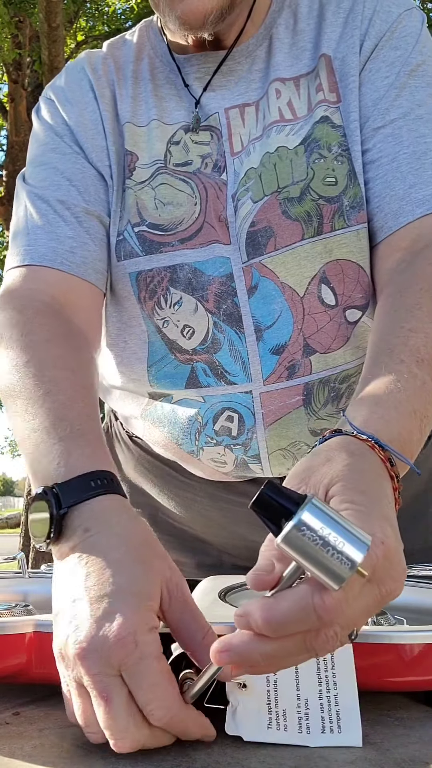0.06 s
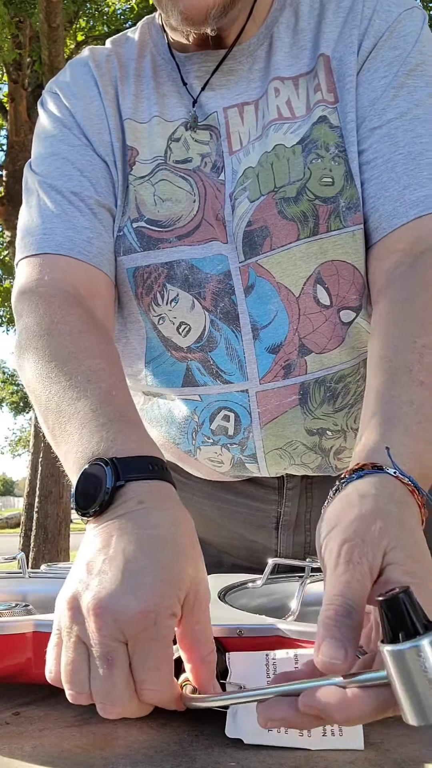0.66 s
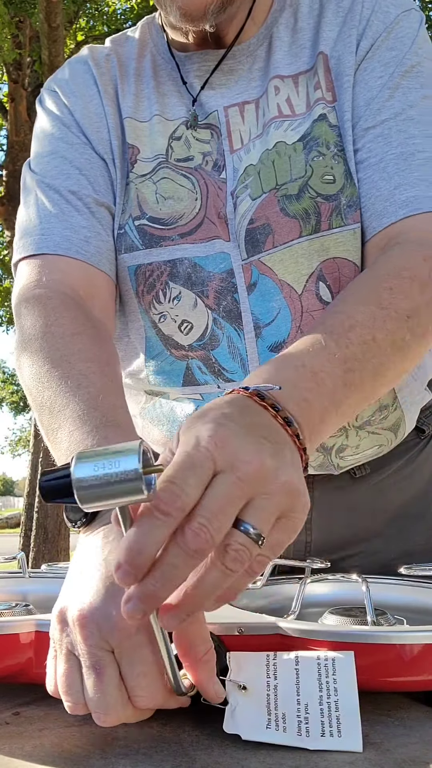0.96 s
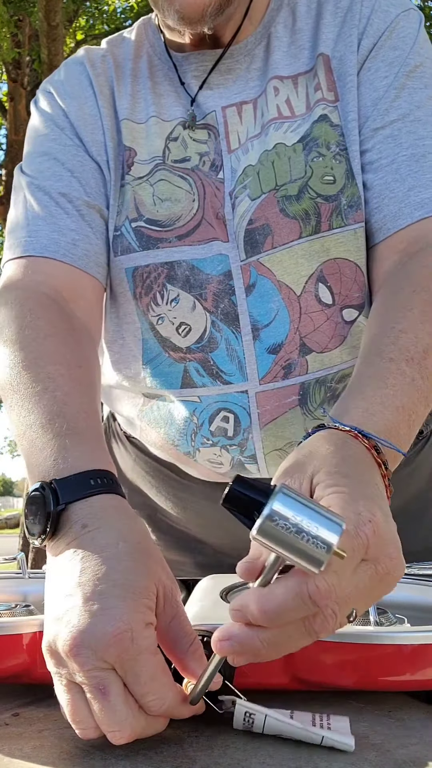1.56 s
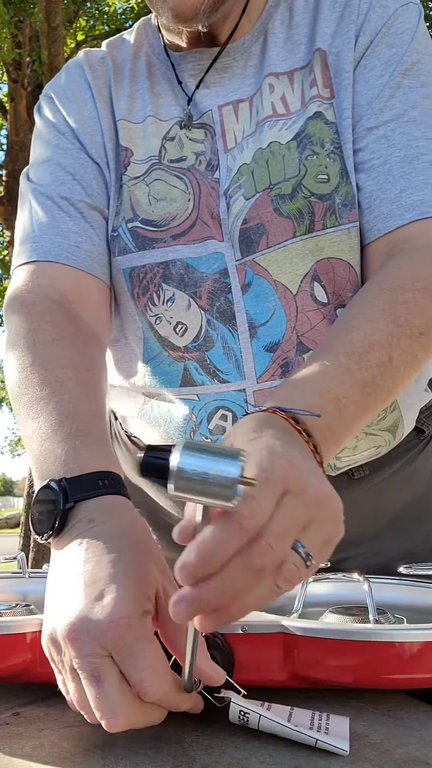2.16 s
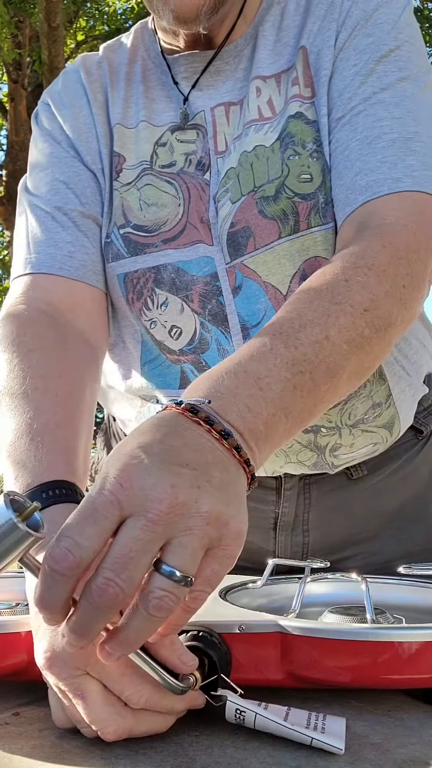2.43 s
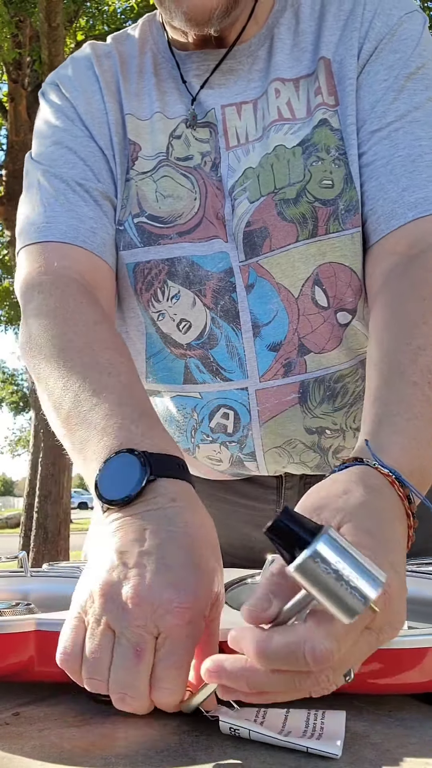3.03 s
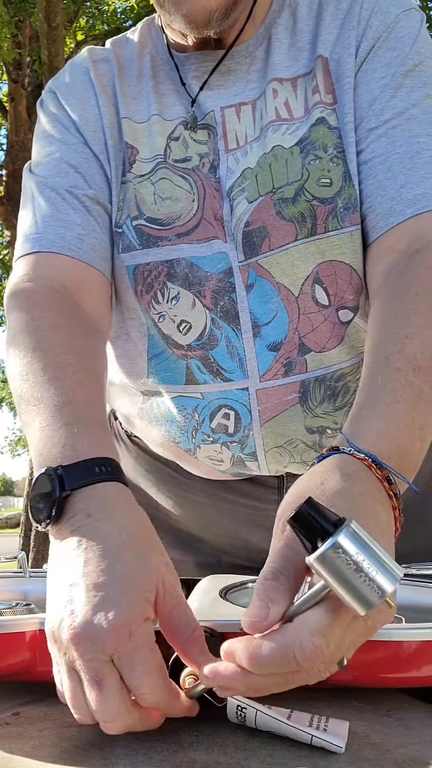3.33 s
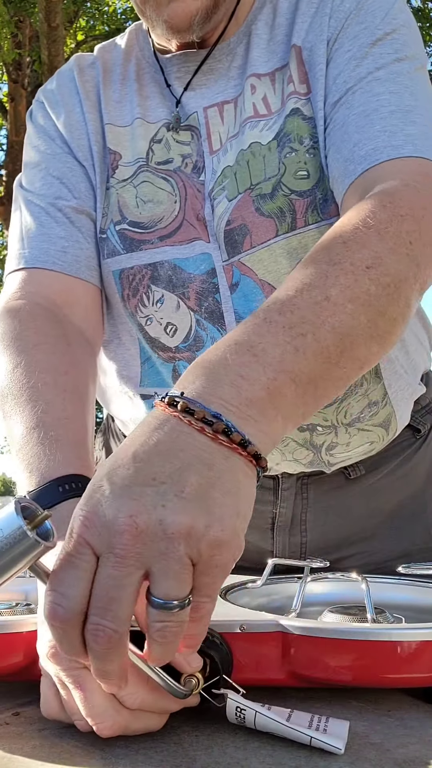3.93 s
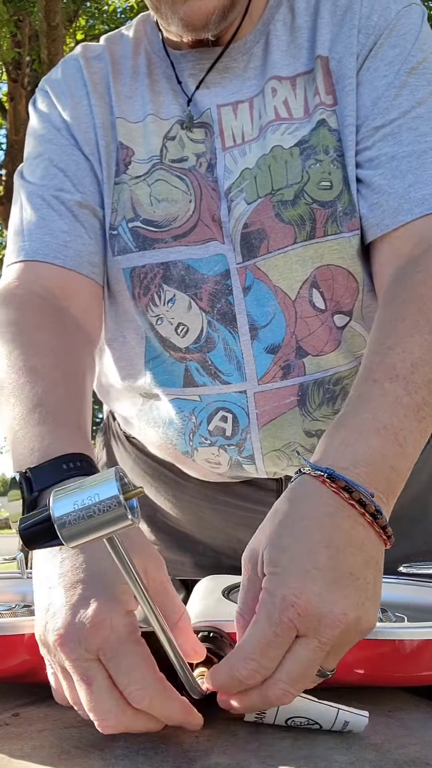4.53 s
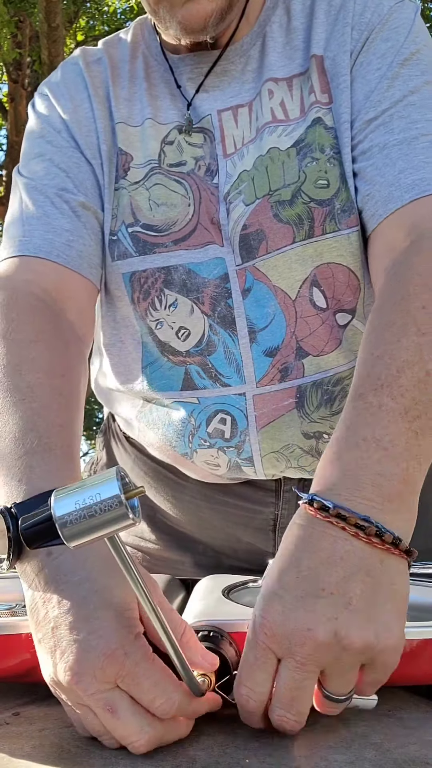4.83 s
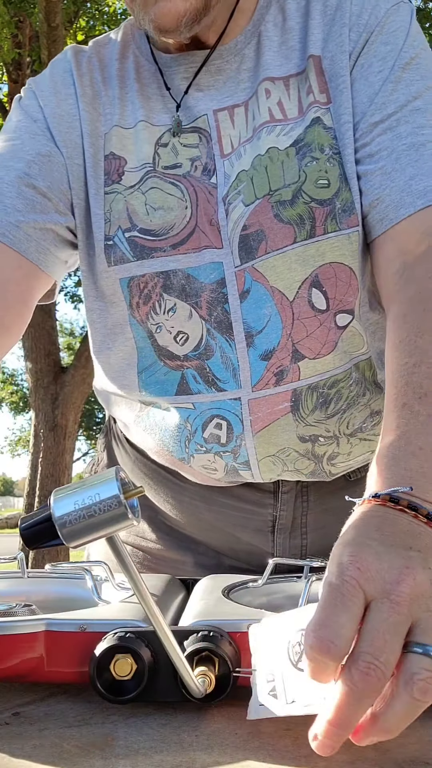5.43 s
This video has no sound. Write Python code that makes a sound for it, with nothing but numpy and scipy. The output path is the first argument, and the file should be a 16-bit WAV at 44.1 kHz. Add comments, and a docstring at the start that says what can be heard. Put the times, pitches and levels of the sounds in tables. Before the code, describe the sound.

Close by in the open air, hollow knocks from a camping stove mix with small, bright clicks as a gas regulator is worked into its inlet. The knocks come unevenly, each with a low thud from the table beneath. A very faint whistle passes midway, then comes a busier run of gritty metal scraping, sharp clicks and the hardest knock. A soft hush lies behind, with light air on the microphone.

```python
"""A metal gas regulator is pushed and twisted into a camping stove on an outdoor table.
The thread grinds and clicks as it sticks and slips, and the stove drags on its feet. Each push knocks
the stove body, the table booms a moment later, and after a hard push the stove hops once.
A faint whistle passes midway, and a distant hush lies behind. Two microphones in light, open air,
the stove nearer the right one."""
import sys
import numpy as np
from scipy import signal
from scipy.fft import rfft, irfft
from scipy.io import wavfile
from scipy.ndimage import uniform_filter1d

SR = 44100
rng = np.random.default_rng(int(sys.argv[2]) if len(sys.argv) > 2 else 0)


def put_to_file(sound):
    """Save the sound as 16-bit audio at rate SR, in the file named by the first command-line argument."""
    columns = np.atleast_2d(sound).T  # one column per channel
    safe = np.clip(columns, -1, 1)
    whole_steps = np.round(safe * 32767)
    wavfile.write(sys.argv[1], SR, whole_steps.astype(np.int16))


N = 246078
TIME = np.arange(N) / SR
HIT_TIME = TIME[:SR // 2]
LEFT_LAG_S = 0.00023  # the left microphone is farther from the stove

# Twists of the thread. Each row: time of full force in seconds, hold in seconds, level in dB,
# attack in seconds, low ring of the fitting in dB.
TWISTS = [(0.0, 0.023, -42.5, .01, 3), (1.283, 0.07, -61.5, .15, 3), (1.455, .025, -42, 0.054, -14),
          (4.319, 0.032, -62.5, 0.25, -4), (4.536, 0.03, -43.5, 0.09, 1.5), (4.734, 0.13, -46, 0.012, 1),
          (4.903, 0.082, -50.5, 0.025, 1.5), (5.081, 0.014, -37, 0.0053, -9.5),
          (5.2, 0.074, -63.5, 0.03, -10), (5.46, 0.009, -45.5, 0.1, -11), (5.548, .04, -44, .04, -34)]
# The regulator sliding on the inlet rim, and the stove shoved along the table.
# Each row: time of full force in seconds, hold in seconds, level in dB, attack in seconds.
RIM_SLIDES = [(4.34, 0.086, -58, 0.14), (4.834, 0.36, -56.5, 0.039), (5.333, .02, -38, 0.057)]
SHOVES = [(0.0, .01, -37, .01), (0.3, .02, -43, .05), (4.303, .07, -46, 0.067), (4.791, 0.19, -51.5, .05),
          (4.96, 0.13, -47.5, .01), (5.174, .008, -40, .008), (5.248, 0.071, -52, .01),
          (5.454, 0.038, -40, .04), (5.548, .03, -33, .02)]
# The distant hush. Each row: time in seconds, level in dB.
HUSH_LEVELS = [(0, -44), (1.2, -46), (2.6, -50.5), (4.1, -50.5), (4.7, -48), (5.58, -50.5)]
# Catches of the thread. Each row: start in seconds, level in dB, slip length in seconds, pitch in Hz.
CATCHES = [(0.055, -26.5, 0.0081, 3520), (0.099, -27, 0.0058, 6150), (1.179, -42, .003, 7200),
           (1.246, -44, .0025, 7200), (1.304, -39, .009, 2860), (1.342, -36.5, 0.002, 4400),
           (1.489, -28, 0.0014, 4600), (1.523, -26.5, 0.001, 4200), (1.684, -30, .002, 4680),
           (1.981, -35.5, 0.0035, 4100), (2.036, -40.5, 0.013, 4230), (2.13, -37.5, 0.0058, 4680),
           (2.447, -44, 0.0054, 4430), (2.51, -46.5, 0.011, 2850), (2.873, -44, 0.006, 4360),
           (2.902, -44.5, 0.0034, 4700), (3.136, -36, 0.004, 4600), (3.17, -40.5, 0.0045, 4560),
           (3.243, -25, 0.0029, 4800), (3.364, -36.5, 0.0013, 5330), (4.226, -46.5, .005, 4330),
           (4.503, -22, 0.014, 4540), (4.561, -24.5, 0.014, 5130), (4.748, -22.5, 0.0032, 3170),
           (4.836, -30.5, 0.019, 5700), (4.907, -27.5, 0.0091, 2850), (4.935, -41, 0.0012, 4300),
           (4.961, -23.5, 0.0053, 4550), (4.988, -28, 0.0042, 5950), (5.044, -15, 0.0082, 6670),
           (5.08, -12, 0.0018, 2290), (5.406, -34, 0.0019, 9400)]
# Pushes on the stove. Each row: start in seconds, level in dB, pitch of the blow in Hz,
# then trims in dB for the metal tick, the body ring and the table boom.
PUSHES = [(0.237, -34.5, 158, -12.5, -13, 0.5), (0.310, -34.5, 478, -26, 9, -4),
          (0.767, -19.5, 392, -21.5, 0, 1), (0.92, -24, 360, -31, -3.5, -4.5),
          (1.187, -19, 367, -28, -1, 1), (1.616, -41, 169, -17, -7, 6), (1.919, -33, 323, -6.5, 0.5, 4),
          (2.0782, -11, 435, -13.5, -0.5, 1.5), (3.089, -32, 337, -4.5, 10, 9.5),
          (3.245, -12.5, 371, -9, 1, 1.5), (3.318, -13.5, 453, -8, 3, 3),
          (3.328, -26.5, 700, -22, 9.5, -15), (3.824, -30, 336, -37, 1.5, -9),
          (4.038, -35, 315, -30, -4, -6.5), (4.449, -5.5, 504, -10, 1.5, -2),
          (5.163, -28.5, 269, -5, -7, -10), (5.456, -36.5, 410, -29, 15, 12),
          (5.486, -27, 297, -24, 1.5, -5.5), (5.548, -21.5, 287, -29, -2.5, 6)]

# Modes of the brass thread and inlet tube, the stove body and griddle, and the table top.
# Each row: frequency in Hz, level in dB, time to fall 60 dB in seconds.
FITTING_MODES = [(2550, 0.5, 0.013), (3029, 12.5, 0.024), (3830, -8.5, 0.18), (4200, -3.5, 0.014),
                 (4890, -7.5, 0.045), (5800, -3.5, .02), (6250, -0.5, .012)]
STOVE_MODES = [(158, 1, 0.078), (210.5, -20.5, 0.82), (263, -6, 0.21), (296.3, -1, 0.22), (334, -15, 0.56),
               (386.1, -2, 0.18), (426.3, -27, 0.48), (533.8, -9, 0.15), (604, -12.5, 0.18),
               (728.4, -5, 0.14), (796, -3, 0.078), (876, -5.5, 0.1), (1019, -13.5, 0.41), (1190, 1, 0.071),
               (1313, -8, 0.09), (1540, -9, 0.13), (1520, -31.5, .14)]
TABLE_MODES = [(57.2, -5.5, 0.54), (72.7, -6, 0.33), (95.14, 2, 0.34), (114.9, -21, 0.87), (145, -11, 0.28)]

# Tone of each source. Each row: frequency in Hz, gain in dB.
METAL_COLOUR = [(300, -23.5), (1000, 4), (1800, -17.5), (2400, 2.5), (3100, -13), (5000, -10), (6800, -10),
                (8200, -29.5), (11000, -29), (13800, -30), (16000, -30)]
RIM_COLOUR = [(300, -8), (700, -1.5), (1150, 4), (1700, -0.5), (2400, -1.5), (3100, 6.5), (4000, -18),
              (5200, -8), (7500, -25), (15000, -47)]
DRAG_COLOUR = [(30, -6), (60, 8), (100, 3), (180, 5), (330, -3.5), (600, -5.5), (900, -5.5), (1500, -16.5),
               (3000, -19.5), (9000, -47)]
HUSH_COLOUR = [(20, -19.5), (32, 3.5), (50, 7), (82, 7.5), (125, 3.5), (165, -4.5), (300, -0.5), (450, -8),
               (900, -11), (1500, -20), (2900, -22), (5000, -27.5), (6500, -34.5), (8500, -52),
               (14000, -56.5)]
PUFF_COLOUR = [(20, 13.5), (50, -11.5), (100, -20), (200, -13), (800, -60.5)]
TICK_COLOUR = [(300, 14), (1200, 1), (1800, -3), (2500, 3), (3600, -6.5), (5000, -6.5), (6500, -14.5),
               (8200, -37), (15000, -49)]
SHUDDER_COLOUR = [(30, -18), (70, 6.5), (170, 5.5), (260, -12), (800, -50.5), (4000, -100)]

# How each source reaches the microphones.
# Each row: frequency in Hz, left minus right in dB, likeness of the two sides from 0 to 1.
FITTING_PLACE = [(1000, -3.5, 1), (2150, 3, 0.28), (3370, 2.5, 0.9), (4100, -12, 0.57), (7200, 3, 0.15),
                 (13000, -12, 0.15)]
STOVE_PLACE = [(60, -3, 1), (141, -3, 0.58), (370, -4.5, 0.55), (820, -3.5, 0.73), (1350, 0, 1),
               (2420, -1, 0.26), (5000, -4.5, 0.5)]
AIR_PLACE = [(60, -1, 0.92), (400, -2, 0.98), (1000, -1, 0.62), (2800, 3, 0.067), (5500, -2.5, 0.062),
             (13000, 2, 0.14)]


def undb(db):
    """Decibels to gain."""
    return 10 ** (np.asarray(db) / 20)


def unit(x):
    """Scale to rms 1."""
    return x / np.sqrt(np.mean(x ** 2))


def fade(t60):
    """Envelope that falls 60 dB in t60 seconds."""
    return np.exp(-np.log(1000) * HIT_TIME / t60)


def onset(rise_s):
    """Envelope that rises smoothly from 0 to 1."""
    return 1 - np.exp(-(HIT_TIME / rise_s) ** 2)


def stroke(s, hold_s, db, attack_s, release_s, curve=1.22):
    """Gain of one movement: it swells up to time s, holds and dies; attack and release span 20 dB."""
    early = np.maximum(s - TIME, 0) / attack_s
    late = np.maximum(TIME - s - hold_s, 0) / release_s
    return undb(np.maximum(db - 20 * (early + late ** curve), -200))


def noise(size=len(HIT_TIME)):
    """Two streams of white noise."""
    return rng.standard_normal((2, size))


def grains(size, rate, spread_db):
    """Two streams of tiny slips of uneven strength, about rate a second."""
    slips = rng.random((2, size)) < rate / SR
    return unit(slips * noise(size) * undb(spread_db * np.minimum(rng.exponential(size=(2, size)), 4)))


def walk(rate):
    """Random wander of rms 1, taking rate steps a second."""
    step = int(SR / rate)
    return unit(uniform_filter1d(np.repeat(rng.standard_normal(N // step + 1), step), step)[:N])


def across(table, size):
    """Spread the columns of a frequency table over the bins of a transform."""
    hz, *columns = np.transpose(table)
    bins = np.log(np.maximum(np.fft.rfftfreq(size, 1 / SR), 1))
    return [np.interp(bins, np.log(hz), column) for column in columns]


def colour(x, points):
    """Causal filter with the given spectrum."""
    size = x.shape[-1]
    cepstrum = irfft(np.log(undb(across(points, size)[0])), size)
    cepstrum[1:size // 2] *= 2
    cepstrum[size // 2 + 1:] = 0
    return irfft(rfft(x) * np.exp(rfft(cepstrum)), size)


def place(pair, table, lag_s=LEFT_LAG_S):
    """Two versions of a sound reach the microphones: partly alike, unequal in level, the left late."""
    size = pair.shape[-1]
    pan_db, alike = across(table, size)
    other, right = rfft(pair)
    delay = np.exp(-2j * np.pi * np.fft.rfftfreq(size, 1 / SR) * lag_s)
    left = (alike * right + np.sqrt(1 - alike ** 2) * other) * delay
    return irfft(np.array([left * undb(pan_db / 2), right * undb(-pan_db / 2)]), size)


def add(out, s, sound):
    """Mix a sound in at time s."""
    start = max(int(s * SR), 0)
    out[:, start:start + sound.shape[-1]] += sound[:, :N - start]


def ring(modes, detune):
    """Damped modes; each contact point detunes them a little."""
    out = 0
    for k, (hz, db, t60) in enumerate(modes):
        hz *= 1 + detune * rng.standard_normal()
        out += (-1) ** k * undb(db) * fade(t60) * np.sin(2 * np.pi * hz * HIT_TIME)
    return out


def resonate(slips, modes, ring_db, detune):
    """Slips heard directly and through the modes of the part they stir."""
    response = ring(modes, detune)
    ringing = signal.fftconvolve(slips, [response / np.linalg.norm(response)], axes=-1)
    return slips + undb(ring_db) * ringing[:, :slips.shape[-1]]


def fitting(slips, detune):
    """Slips ring the brass thread and inlet tube."""
    return colour(resonate(slips, FITTING_MODES, ring_db=-2.5, detune=detune), METAL_COLOUR)


def thread_grind(judder_db=3, shift_db=4, low_ring_hz=3300, treble_db=-3, treble_hz=8000):
    """Metal on metal: dense, juddering slips in the thread with each twist."""
    bands = 0
    for hz in np.geomspace(1600, 14000, num=12):
        bandpass = signal.butter(2, [hz / 1.1, hz * 1.1], "band", fs=SR, output="sos")
        band = signal.sosfilt(bandpass, grains(N, rate=2200, spread_db=2.5))
        # as the contact moves round the thread, each band swells and sinks by itself
        bands += band * undb(shift_db * walk(35) + treble_db * (hz > treble_hz))
    thread = unit(fitting(bands, detune=0.017)) * undb(judder_db * walk(90))
    # the grip of each twist damps the low ring more or less
    low = signal.sosfiltfilt(signal.butter(4, low_ring_hz, fs=SR, output="sos"), thread)
    twists = sum((thread - low + undb(low_db) * low) * stroke(*twist, release_s=0.083)
                 for *twist, low_db in TWISTS)
    return place(twists, FITTING_PLACE)


def dragging_feet():
    """The feet stick and slip on the table and stir the stove body."""
    slips = grains(N, rate=1100, spread_db=-0.5)
    rub = colour(resonate(slips, STOVE_MODES, ring_db=-14, detune=0.0018), DRAG_COLOUR)
    force = sum(stroke(*shove, release_s=0.05) for shove in SHOVES)
    return place(unit(rub) * force, STOVE_PLACE)


def open_air(waver_db=1.14, gust_db=3, breeze_db=-61):
    """Distant hush, with light puffs of air rumbling on the microphones."""
    hush_db = np.interp(TIME, *np.transpose(HUSH_LEVELS))
    hush = unit(colour(noise(N), HUSH_COLOUR)) * undb(hush_db + waver_db * walk(27))
    puffs = unit(colour(noise(N), PUFF_COLOUR)) * undb(breeze_db + gust_db * walk(10))
    return place(hush + puffs, AIR_PLACE, lag_s=0)


def thread_clicks(soft_edge_db=-19, soft_edge_s=0.022, lead_s=0.034,
                  bright_hz=4600, bright_db_per_octave=19):
    """Each click swells in softly, bursts as the thread lets go and fades; the grip retunes the ring."""
    out = np.zeros((2, N))
    for s, db, slip_s, hz in CATCHES:
        from_peak = TIME[:SR // 10] - lead_s - slip_s / 2
        letting_go = np.exp(-(2 * from_peak / slip_s) ** 2)
        soft_edge = undb(soft_edge_db) * np.exp(-np.abs(from_peak) / soft_edge_s)
        burst = grains(len(from_peak), rate=16000, spread_db=0.5) * (letting_go + soft_edge)
        # a tighter catch rings higher and gains top treble
        bright_db = bright_db_per_octave * max(np.log2(hz / bright_hz), 0)
        tone = [(hz / 3.1, -7), (hz / 1.154, 0), (hz, 8), (hz * 1.075, 0), (12000, bright_db - 9)]
        add(out, s - lead_s, undb(db) * fitting(colour(burst, tone), detune=0.065))
    return place(out, FITTING_PLACE)


def stove_body(hz, trim_db, contact, blow_db=1, body_db=-11, rattle_db=-12, crest_s=0.0041, cycles=0.62):
    """A padded blow: the stove springs back in little more than one swing, rings and rattles."""
    swing = (HIT_TIME - crest_s) * hz
    blow = np.exp(-0.5 * (swing / cycles) ** 2) * np.sin(2 * np.pi * swing + 1) * contact
    # a harder blow reaches higher modes
    hardness = [(hz / 3, -5), (hz * 0.93, 0), (hz * 1.38, -2),
                (hz * 3.1, -14), (hz * 8, -42), (hz * 20, -75)]
    body = colour(ring(STOVE_MODES, detune=0.0084) * contact, hardness)
    rattle = colour(noise() * fade(t60=0.16) * contact, hardness) * np.sqrt(SR / hz) / 2
    struck = undb(blow_db) * blow + undb(body_db + trim_db) * body
    return np.outer([0, 1], struck) + undb(rattle_db + trim_db) * rattle


def metal_tick(contact, jingle_db=-14):
    """Loose metal parts tick at once, then chatter on."""
    tick = noise() * fade(t60=0.041)
    jingle = grains(len(HIT_TIME), rate=1200, spread_db=-1) * fade(t60=0.35)
    return colour((tick + undb(jingle_db) * jingle) * contact, TICK_COLOUR)


def table_boom(shudder_db=-8, buzz_db=-27):
    """The table takes a moment to get going, and the things on it shudder."""
    shudder = unit(colour(noise(), SHUDDER_COLOUR)) * fade(t60=0.28)
    table_top = np.outer([0, 1], ring(TABLE_MODES, detune=0.018))
    boom = (table_top + undb(shudder_db) * shudder) * onset(rise_s=0.023)
    # a loose part buzzes at the crest of each swing
    crest = np.maximum(boom[1] / np.abs(boom[1]).max(), 0) ** 2
    return boom + undb(buzz_db) * colour(noise() * crest, METAL_COLOUR)


def knocks(tick_db=3, boom_db=-6, boom_lag_s=0.01453, hop_above_db=-13.5, hop_s=0.022, hop_db=-12.5):
    """Each push knocks the stove, then the table; a hard one lifts the stove, which lands more softly."""
    out = np.zeros((2, N))
    hops = [(s + hop_s, db + hop_db, *rest) for s, db, *rest in PUSHES if db > hop_above_db]
    for s, db, hz, tick_trim_db, body_trim_db, boom_trim_db in PUSHES + hops:
        contact = onset(rise_s=0.0027)
        add(out, s, undb(db) * stove_body(hz, body_trim_db, contact))
        add(out, s, undb(db + tick_db + tick_trim_db) * metal_tick(contact))
        add(out, s + boom_lag_s, undb(db + boom_db + boom_trim_db) * table_boom())
    return place(out, STOVE_PLACE)


def whistle(hz=3620, width_hz=300):
    """A faint, narrow hiss, perhaps gas slipping past the seal."""
    band = signal.iirpeak(hz, hz / width_hz, fs=SR)
    hiss = signal.lfilter(*band, signal.lfilter(*band, noise(N)))
    return unit(hiss) * stroke(s=3.47, hold_s=0.16, db=-64.5, attack_s=0.08, release_s=0.17)


def rim_slide():
    """The regulator body slides on the inlet rim, in duller slips than the thread's."""
    rub = unit(colour(grains(N, rate=2900, spread_db=3), RIM_COLOUR))
    force = sum(stroke(*slide, release_s=0.04) for slide in RIM_SLIDES)
    return place(rub * force, FITTING_PLACE)


def scene():
    """The stove, its table and the open air as they arrive at the two microphones."""
    stove = knocks() + thread_clicks() + thread_grind() + rim_slide() + dragging_feet() + whistle()
    return stove + open_air()


def record(dry, port_hz=4880, port_db=-3, port_q=14, top_hz=15800):
    """The microphone ports ring a little, and the recorder cuts the top of the treble."""
    port_ring = signal.lfilter(*signal.iirpeak(port_hz, port_q, fs=SR), dry)
    lowpass = signal.ellip(8, 0.2, 70, top_hz, fs=SR, output="sos")
    return signal.sosfilt(lowpass, dry + undb(port_db) * port_ring)


dry = scene()
out = record(dry)
put_to_file(out)
```